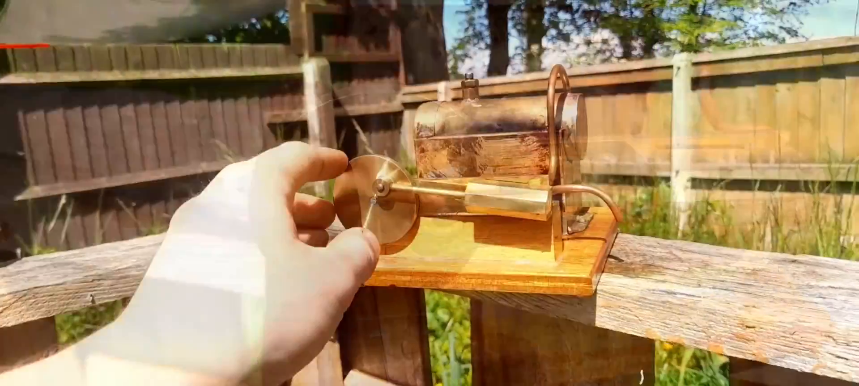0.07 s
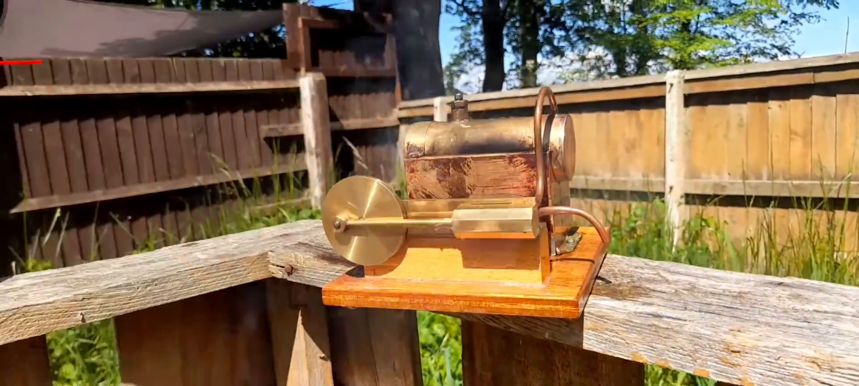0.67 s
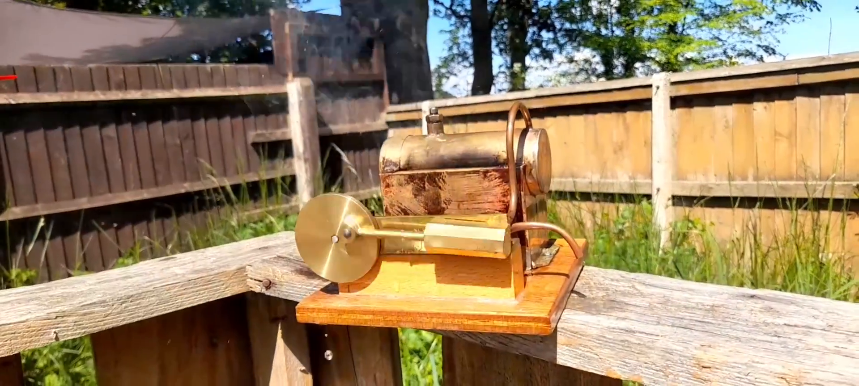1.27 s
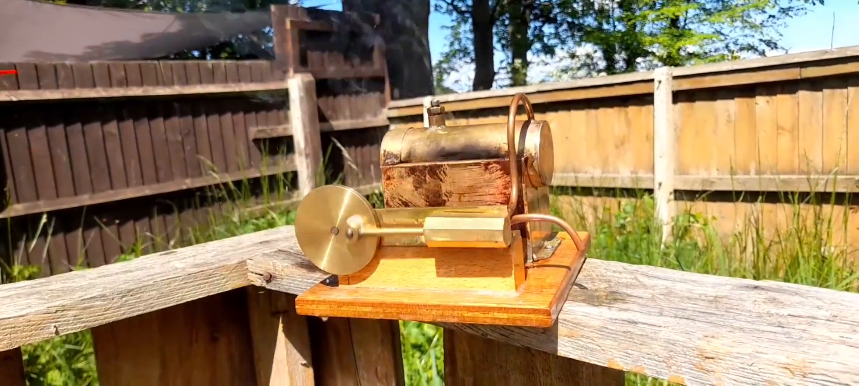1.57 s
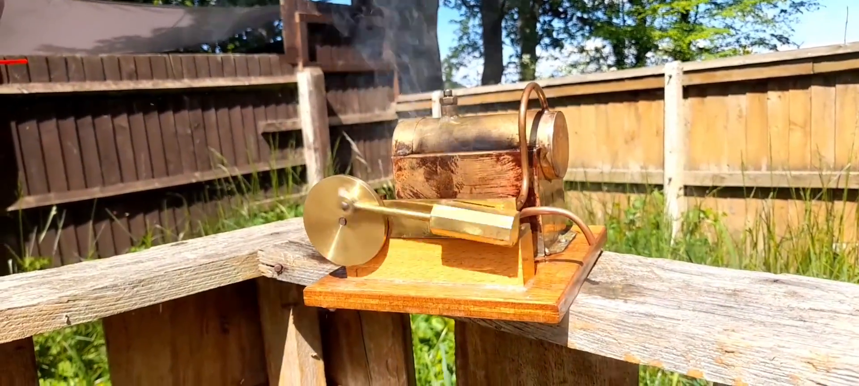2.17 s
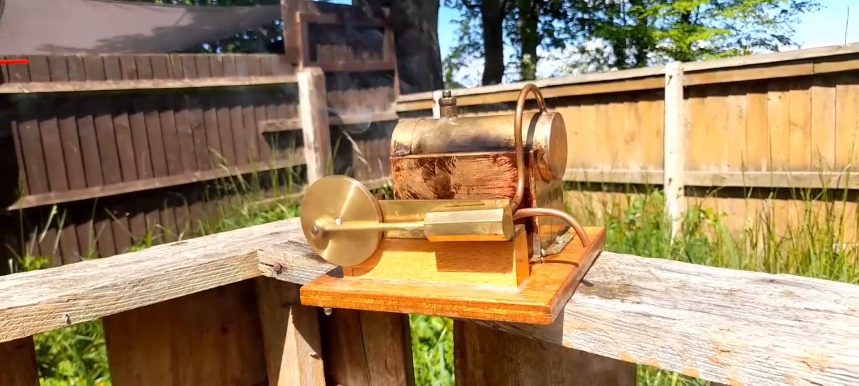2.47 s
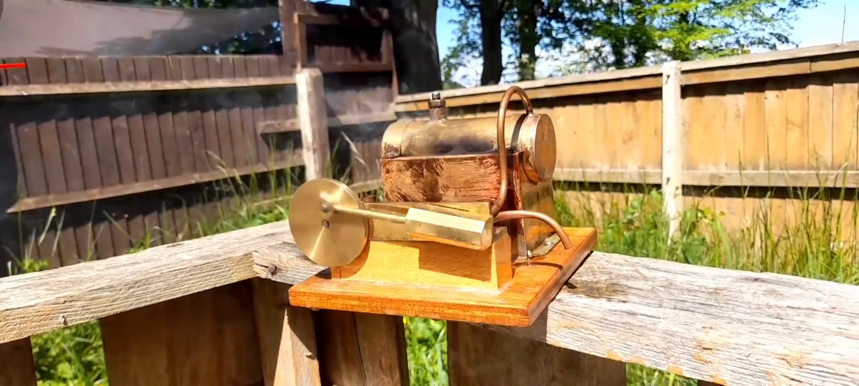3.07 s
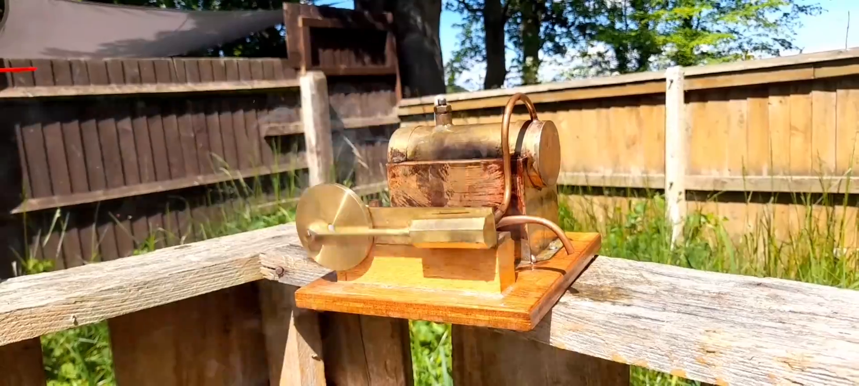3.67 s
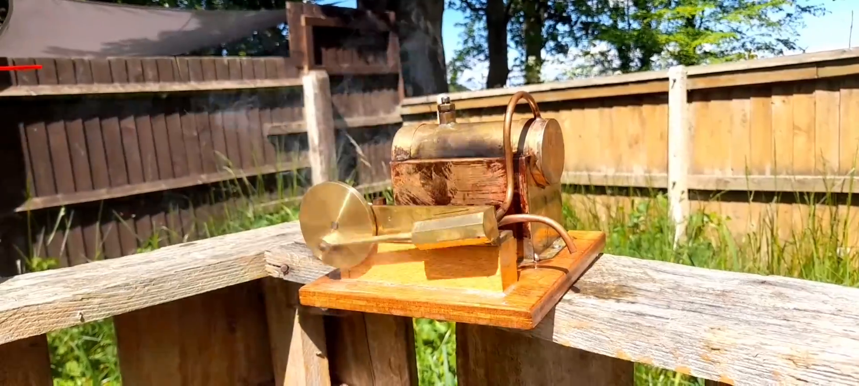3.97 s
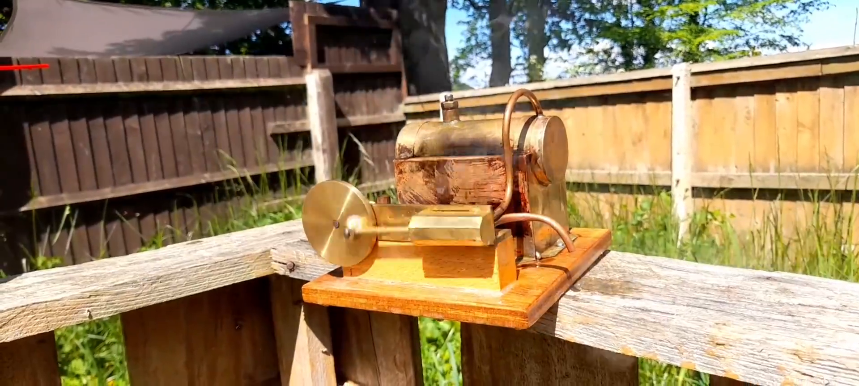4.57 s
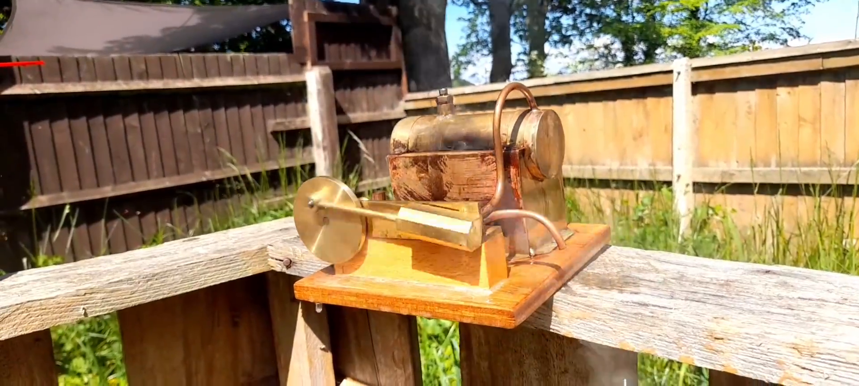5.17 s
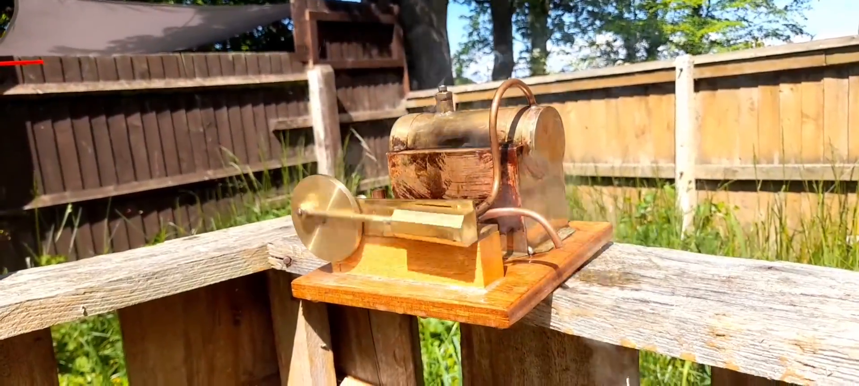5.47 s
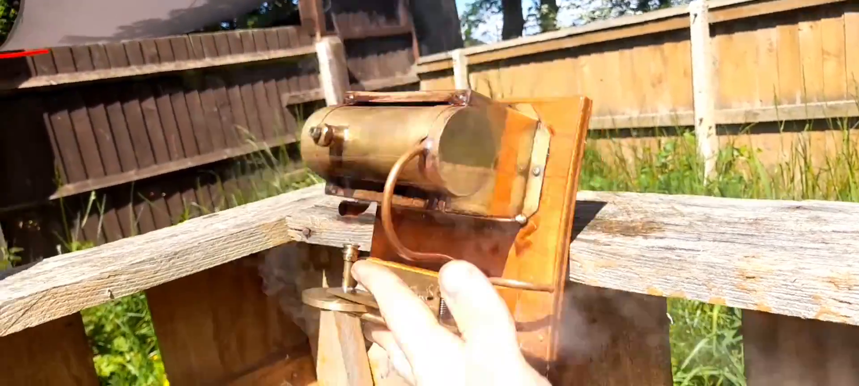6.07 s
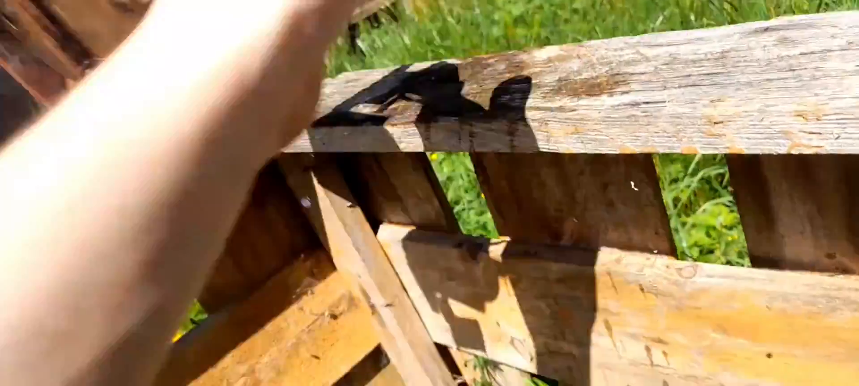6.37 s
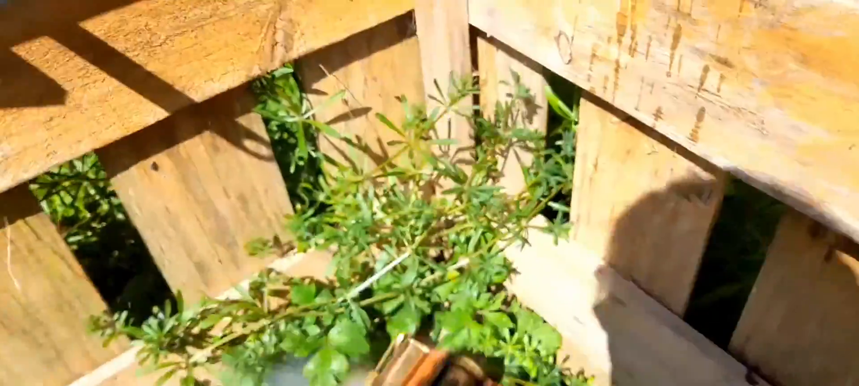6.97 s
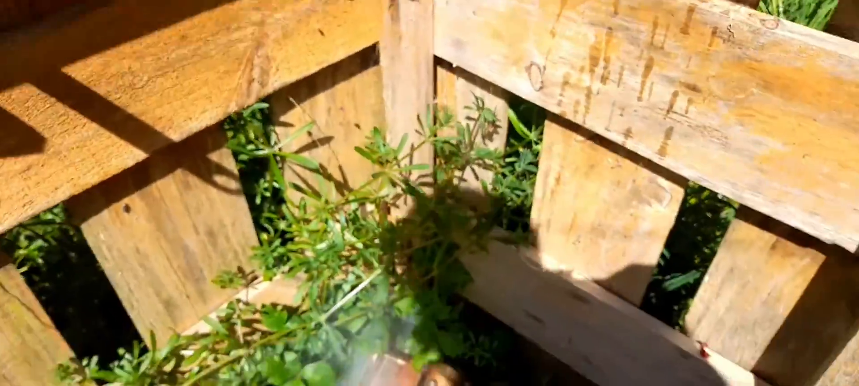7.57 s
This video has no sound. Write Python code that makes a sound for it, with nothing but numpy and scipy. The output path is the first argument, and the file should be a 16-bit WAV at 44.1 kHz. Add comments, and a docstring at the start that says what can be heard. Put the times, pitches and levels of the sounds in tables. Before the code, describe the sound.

A small steam engine is heard close up in a garden, over a soft hiss of leaking steam. At about 0.4 seconds its pivot gives a faint squeak and it starts turning, speeding up over two seconds to a fast, even rhythm of roughly sixteen beats a second. Each beat combines a spit of steam with a light metallic knock. Stray water ticks come through, and low wind gusts buffet the microphone near 0.8 seconds and from 3.8 to 4.6. At 6 seconds the beat stops as the engine scrapes and knocks off a wooden rail, sputtering steam. Loud, dull handling thumps hit the microphone around 6.6 seconds. At 6.8 the engine lands with a loud clatter of wood and ringing brass, bouncing until about 7.1. From the landing, a steady, bright hiss of escaping steam continues to the end, near 8 seconds.

```python
"""A small oscillating steam engine on a garden fence rail is flicked into motion and settles near sixteen
turns a second. Each turn gives a port hiss, a bearing knock, an exhaust spit and a softer return knock,
all noise bursts shaped by its resonances, while joints leak and gusts buffet the microphone.
At six seconds it tips off the rail, the microphone is jostled, and the engine clatters to the ground,
frame and brass ringing, and lies there blowing off steam."""
import sys
import numpy as np
from scipy import signal
from scipy.fft import rfft, irfft
from scipy.io import wavfile
from scipy.ndimage import uniform_filter1d

SR = 44100
rng = np.random.default_rng(int(sys.argv[2]) if len(sys.argv) > 2 else 0)


def bounce(signal):
    """Save signal as a 16-bit WAV file at the path given by the first command-line argument."""
    frames = np.transpose(np.atleast_2d(signal))
    limited = np.clip(frames, -1, 1)
    pcm = np.round(limited * 32767).astype(np.int16)
    wavfile.write(sys.argv[1], SR, pcm)


N = 343980
TIME = np.arange(N) / SR
FLICK_S, FIRST_TURN_S, TIP_S, LANDING_S = .29, .433, 6.05, 6.8


def from_db(db):
    """Decibels to gain."""
    return 10 ** (np.asarray(db) / 20)


def rms_one(x):
    """Scale to unit rms."""
    return x / np.sqrt(np.mean(x ** 2) + 1e-20)


def in_time(rows):
    """A curve's columns, interpolated to every sample."""
    times, *columns = np.transpose(rows)
    return [np.interp(TIME, times, column) for column in columns]


def at_hz(points, hz):
    """Read a curve on a log-frequency axis."""
    freqs, values = np.transpose(points)
    return np.interp(np.log(hz + 1), np.log(freqs), values)


def add(out, start_s, sound):
    """Mix a stereo sound in at start_s."""
    i = max(int(start_s * SR), 0)
    out[:, i:i + sound.shape[-1]] += sound[:, :max(N - i, 0)]


def drift(rate_hz):
    """Random wander of unit rms that changes about rate_hz times a second."""
    knots = rng.standard_normal(N)
    return rms_one(np.interp(TIME * rate_hz, np.arange(N), knots))


def envelope(start_s, length_s, attack_s, release_s):
    """Rise, hold until length_s has passed, then die away."""
    age = TIME - start_s
    return np.clip(age / attack_s, 0, 1) * np.exp(-np.maximum(age - length_s, 0) / release_s)


def panned(db):
    """Equal-power gains with the left side db above the right."""
    gains = from_db(np.array([[.5], [-.5]]) * db)
    return gains / np.sqrt(np.mean(gains ** 2, axis=0))


def butter(x, hz, kind, order=2):
    """Butterworth filter."""
    sos = signal.butter(order, np.minimum(hz, .45 * SR), kind, fs=SR, output="sos")
    return signal.sosfilt(sos, x)


def resonance(x, hz, width_hz):
    """Ring one hollow note."""
    return butter(x, [hz - width_hz / 2, hz + width_hz / 2], "band", order=1)


def colour(x, eq, size=4096):
    """Minimum-phase EQ through (freq_hz, gain_db) points."""
    gains = from_db(at_hz(eq, np.arange(size // 2 + 1) * SR / size))
    cepstrum = irfft(np.log(gains))
    cepstrum[1:size // 2] *= 2
    cepstrum[size // 2 + 1:] = 0
    impulse = irfft(np.exp(rfft(cepstrum)))
    return signal.fftconvolve(x, impulse[None], axes=-1)[:, :x.shape[-1]]


def struck(modes, t, spread_db):
    """Decaying modes, each with its own strength and phase on either side."""
    hz, db, t60 = np.transpose(modes)[:, :, None, None]
    shape = (len(modes), 2, 1)
    gain = from_db(db + spread_db * rng.standard_normal(shape) - 60 * t / t60)
    return np.sum(gain * np.sin(2 * np.pi * (hz * t + rng.random(shape))), axis=0)


# how the ports colour each side, at full lean: freq_hz, pan_db
AIR_PAN = [(100, -4.5), (400, -3), (900, 1), (1400, -3.5), (2200, -2), (3400, -3.5), (5300, -14),
           (7000, -8), (8500, 1.5), (15000, 0)]
# how alike the two sides are: freq_hz, correlation
AIR_CORRELATION = [(60, 0.47), (250, 0.88), (700, 0.59), (1400, 0.54), (3000, 0.12), (7000, 0.016),
                   (15000, 0.13)]
def air_noise(lean=0.79):
    """White stereo noise, narrow in the lows, wide on top; lean pulls the presence range right."""
    hz = np.arange(N // 2 + 1) * SR / N
    mid, side = rfft(rng.standard_normal((2, N)))
    alike = np.clip(at_hz(AIR_CORRELATION, hz), -.95, .95)
    pair = np.sqrt(1 + alike) * mid + np.sqrt(1 - alike) * side * [[1], [-1]]
    return rms_one(irfft(pair * panned(lean * at_hz(AIR_PAN, hz)), N))


# flywheel run-up, shared with the engine's strokes: time_s, turns_per_s
FLYWHEEL_SPEED = [(0.527, 7.184), (1.2335, 12.645), (1.657, 14.38), (2.231, 15.3), (3.594, 16.174)]
# steam pressure, riding leaks, exhaust and port hiss alike: time_s, gain_db
STEAM_PRESSURE = [(2.2, 1), (3.3, -0.5), (4.3, 1.5), (5.3, -1), (6.0, -.5)]
# tone of the burner and leaks: freq_hz, gain_db
LEAK_EQ = [(88, -39), (150, 1.5), (182, -11.5), (275, 1.5), (854, -8), (1020, -12.5), (1360, -5),
           (1530, -11.5), (3420, -10), (4080, -8.5), (5360, -5.5), (6770, -7), (8230, -23.5), (12700, -14),
           (16000, -22.5)]
def leaks(rest_db=-59, full_speed_db=-51, tipped_db=-47.5, fade_s=0.056):
    """Burner and leaking joints make a soft, uneven bed that rises at the flick and again at the tip."""
    speed, = in_time(FLYWHEEL_SPEED)
    pressure_db, = in_time(STEAM_PRESSURE)
    started, tipped = (np.clip((TIME - s) / fade_s, 0, 1) for s in (FLICK_S, TIP_S))
    running_db = full_speed_db + pressure_db - 0.53 * (speed.max() - speed)
    level_db = (1 - started) * rest_db + (started - tipped) * running_db + tipped * tipped_db
    return from_db(level_db + 2.25 * drift(120)) * rms_one(colour(air_noise(lean=0.92), LEAK_EQ))


# tone of the buffeting: freq_hz, gain_db
WIND_EQ = [(20, -39), (40, -1.5), (70, 4.5), (110, 4.5), (180, -11.5), (300, -24.5), (600, -44.5),
           (2000, -61)]
# gusts on the microphone: peak_s, half_length_s, gain_db, pan_db
WIND_GUSTS = [(0.39, 0.043, -42, 32), (0.593, 0.058, -51, 28), (0.779, 0.023, -26, 36),
              (0.865, 0.034, -30, 24), (0.976, 0.016, -34.5, 23), (1.174, 0.019, -42.5, -29),
              (1.385, 0.019, -37.5, -29), (1.5, 0.02, -36.5, -30), (1.833, 0.042, -41.5, 6),
              (2.073, 0.054, -52, 5), (2.25, .03, -46, 13), (2.585, 0.021, -47, 13), (3.8, 0.052, -26, -40),
              (3.92, 0.033, -43, -8), (4.057, .04, -44, -5), (4.243, .035, -45, -20),
              (4.403, 0.054, -31.5, -22), (4.565, 0.053, -35.5, -6.5), (4.74, 0.062, -47.5, -15)]
# jolts that shake the microphone: start_s, level_db, pan_db
MIC_JOLTS = [(6.545, -18, -7), (6.63, -21.5, -7), (6.823, -24, -2), (7.297, -48, 0)]
def wind_and_jolts(breeze_db=-57.5):
    """Low buffeting: a light breeze, gusts that swell and fade on one side, and the rumble of jolts."""
    buffet = colour(air_noise(lean=0), WIND_EQ)
    buffet /= np.sqrt(uniform_filter1d(buffet ** 2, size=3000, axis=-1))  # even out the noise's level
    power = from_db(breeze_db + 3 * drift(6.6)) ** 2
    for peak_s, half_length_s, db, pan_db in WIND_GUSTS:
        swell = 1 / np.cosh(np.minimum(1.33 * np.abs(TIME - peak_s) / half_length_s, 20))
        power = power + (from_db(db + 2.5) * panned(pan_db) * swell) ** 2
    for start_s, db, pan_db in MIC_JOLTS:
        shake = envelope(start_s, length_s=0.013, attack_s=0.0064, release_s=0.033)
        power = power + (from_db(db) * panned(pan_db) * shake) ** 2
    return np.sqrt(power) * buffet


# pivot chirps: peak_s, pitch_hz, level_db, width_s
PIVOT_SQUEAKS = [(0.371, 4350, -46.5, 0.0063), (.506, 3900, -52.5, .004)]
def pivot_squeaks():
    """The dry pivot gives brief, breathy notes as the flywheel is flicked."""
    noise, out = air_noise(), np.zeros((2, N))
    for peak_s, hz, db, width_s in PIVOT_SQUEAKS:
        swell = np.exp(-((TIME - peak_s) / width_s) ** 2 / 2)
        out += from_db(db) * swell * rms_one(resonance(noise, hz, hz / 15))
    return out


def each_turn(tone, noise, lead_turns, level_db, rise_s, decay_s, spread_db, jitter_s):
    """One noise burst a turn, filtered by tone, lead_turns before the exhaust opens, until the tip."""
    speed, = in_time(FLYWHEEL_SPEED)
    turns = np.cumsum(speed) / SR
    turns -= np.interp(FIRST_TURN_S, TIME, turns)
    count = np.arange(np.interp(TIP_S, TIME, turns))
    leads = np.interp(count, turns, lead_turns + np.zeros(N))
    starts = np.interp(count - leads, turns, TIME)
    out, t = np.zeros((2, N)), np.arange(SR // 25) / SR
    shape = (1 - np.exp(-(t / rise_s) ** 2)) * np.exp(-t / decay_s)
    slices = noise[:, :len(count) * len(t)].reshape(2, len(count), len(t))
    # the same surfaces meet on every turn, so part of each burst repeats
    slices = (slices + from_db(-2.5) * slices[:, :1]).reshape(-1, len(t))
    bursts = tone(slices * shape).reshape(2, len(count), -1)
    for k, (late, strong) in enumerate(rng.standard_normal((len(count), 2))):
        gain = from_db(level_db[int(starts[k] * SR)] + spread_db * strong)
        add(out, starts[k] + jitter_s * late, gain * rms_one(bursts[:, k]))
    return out


# the running engine's resonances: pitch_hz, width_hz, gain_db
BODY_MODES = [(393, 166, -4.5), (856, 54, -0.5), (1163, 94, -7), (1353, 34, 7.5), (1808, 58, -2.5),
              (2720, 380, -7), (3444, 180, 1.0), (4490, 330, 3), (5300, 680, -2), (5900, 380, -2.5),
              (6580, 610, -3.5)]
def engine_body(x):
    """The engine's resonances ring in parallel, in alternating polarity."""
    out = 0
    for k, (hz, width_hz, db) in enumerate(BODY_MODES):
        radius = np.exp(-np.pi * width_hz / SR)
        feedback = [1, -2 * radius * np.cos(2 * np.pi * hz / SR), radius ** 2]
        mode = signal.lfilter([1, 0, -1], feedback, x) * (1 - radius ** 2) / 2
        out = out + (-1) ** k * from_db(db) * mode
    return out


def cylinder(x):
    """The cylinder's hollow note, rung by the piston at either end of its travel."""
    return resonance(x, hz=1365, width_hz=130)


# play in the bearing: time_s, lead_turns, knock_gain_db, hollow_offset_db
BEARING_PLAY = [(0.43, 0.22, -44, -8.5), (1.0, 0.22, -36, -18), (1.4, 0.25, -40.5, -8),
                (1.9, 0.25, -36.5, -1.5), (2.3, 0.3, -36, -4), (3.0, .285, -41, -7.5),
                (4.2, 0.32, -40, -8.5), (6.0, 0.32, -40.5, -7.5)]
# the crank pin's tinkle during the run-up: time_s, level_db
PIN_TINKLE = [(0.4, -66.5), (2.5, -56), (3.1, -71)]
def knocks():
    """Each turn the bearing takes up its slack, the crank pin tinkles and the piston knocks back."""
    speed, = in_time(FLYWHEEL_SPEED)
    lead, knock_db, hollow_db = in_time(BEARING_PLAY)
    tinkle_db, = in_time(PIN_TINKLE)
    shaking = np.exp(-((speed - 10.85) / 1.9) ** 2)  # a shaky range of speeds swells the return knock
    return_db = -61 - 1.3 * (speed.max() - speed) + 18 * shaking
    grit = air_noise() * from_db(4.3 * drift(3000))
    crank_pin = lambda x: resonance(x, hz=12200, width_hz=830)
    knock = each_turn(engine_body, grit, lead + .012, knock_db - 9,
                      rise_s=.0016, decay_s=.0018, spread_db=1.2, jitter_s=.0003)
    hollow = each_turn(cylinder, air_noise(), lead, knock_db + hollow_db - 11.5,
                       rise_s=.00059, decay_s=.0042, spread_db=1.5, jitter_s=.00029)
    tinkle = each_turn(crank_pin, air_noise(), lead + .03, tinkle_db,
                       rise_s=.00079, decay_s=.0022, spread_db=1.5, jitter_s=.0003)
    return_knock = each_turn(cylinder, air_noise(), lead - .55, return_db,
                             rise_s=.0012, decay_s=.0035, spread_db=0.5, jitter_s=.00034)
    return knock + hollow + tinkle + return_knock


# tone of the exhaust pipe: freq_hz, gain_db
EXHAUST_EQ = [(200, -41), (800, 1), (1350, -7), (2000, -1.5), (3500, -0.5), (5200, 3), (6800, -1.5),
              (7900, -14), (10000, -7), (12700, -5.5), (16000, -8.5)]
def exhaust():
    """Wet steam spits out once a turn and trails off, louder with speed and pressure."""
    speed, = in_time(FLYWHEEL_SPEED)
    pressure_db, = in_time(STEAM_PRESSURE)
    spit_db = -50.5 + pressure_db - 2.9 * (speed.max() - speed)
    grit = air_noise() * from_db(3.5 * drift(3000))
    pipe = lambda x: colour(x, EXHAUST_EQ)
    spit = each_turn(pipe, grit, lead_turns=.03, level_db=spit_db,
                     rise_s=.0016, decay_s=.0015, spread_db=1.1, jitter_s=.0004)
    trail = each_turn(pipe, air_noise(), lead_turns=.05, level_db=spit_db - 6.5,
                      rise_s=.002, decay_s=.0062, spread_db=1.5, jitter_s=.00067)
    return spit + trail


# water spits and stray ticks: start_s, dry_peak_db, pitch_hz
WATER_TICKS = [(0.4599, -36, 1160), (0.469, -38, 1200), (1.013, -35, 3000), (1.416, -20.5, 3420),
               (1.415, -26.5, 970), (1.428, -27, 2700), (1.487, -31, 1490), (2.03, -25.5, 1030),
               (3.916, -26, 5970), (4.067, -30.5, 1700), (4.572, -27, 1690), (4.633, -26, 4500),
               (4.701, -30, 13000), (4.896, -28.5, 7000), (4.928, -31, 1440), (5.24, -27, 1560),
               (5.61, -28.5, 6700)]
def ticks(decay_s=0.002, ring_db=3.0):
    """Spitting water and lone sharp ticks, which also ring the engine's body."""
    out, t = np.zeros((2, N)), np.arange(SR // 50) / SR
    for start_s, db, hz in WATER_TICKS:
        burst = rng.standard_normal((2, len(t))) * np.exp(-t / decay_s)
        tick = butter(burst, [hz / 2, hz * 1.28], "band", order=1)
        add(out, start_s, from_db(db) * panned(-3.6) * tick / np.abs(tick).max())
    return out + from_db(ring_db) * engine_body(out + 1e-18)


# tone of the steam port: freq_hz, gain_db
PORT_EQ = [(1000, -15), (3500, 3), (4600, -7), (5500, 3), (6700, -4), (7800, -9.5), (16000, -12)]
def port_whistle(x, from_hz=4400, to_hz=7000, glide_s=.014, whistle_db=6.0):
    """As the port narrows, a breathy whistle climbs through its hiss."""
    hz = np.interp(np.arange(x.shape[-1]) / SR, [0, glide_s], [from_hz, to_hz])
    whistle = butter(x, 520, "low") * np.cos(2 * np.pi * np.cumsum(hz) / SR)
    whistle = (whistle.reshape(2, -1) * panned(-13.0)).reshape(x.shape)
    return rms_one(colour(x, PORT_EQ)) + from_db(whistle_db) * rms_one(whistle)


def port_hiss(full_turns_per_s=13.3):
    """The port hisses just ahead of each knock, fully only once the engine is fast enough."""
    speed, = in_time(FLYWHEEL_SPEED)
    pressure_db, = in_time(STEAM_PRESSURE)
    knock_lead, _, _ = in_time(BEARING_PLAY)
    level_db = -52.5 + pressure_db - 11 * np.maximum(full_turns_per_s - speed, 0)
    return each_turn(port_whistle, air_noise(lean=0.76), knock_lead + .205, level_db,
                     rise_s=.01, decay_s=.0033, spread_db=4.0, jitter_s=.00054)


# short jets of steam: start_s, length_s, level_db
STEAM_SPURTS = [(4.894, 0.026, -46), (6.105, 0.017, -27.5), (6.126, 0.093, -34), (6.228, 0.027, -44),
                (6.385, 0.023, -40.5), (6.4117, 0.0018, -19), (6.419, 0.024, -25), (6.445, 0.0046, -21.5),
                (6.458, 0.058, -41.5)]
# tone of a jet, also used for the brass rasp: freq_hz, gain_db
JET_EQ = [(300, 3), (1200, -6), (2500, -5.5), (4000, 0.5), (6200, 6.5), (8000, -12), (12500, -8),
          (16000, -17)]
def steam_spurts():
    """Jets sputter from the boiler as it tips."""
    jets = sum(from_db(db) * envelope(start_s, length_s, attack_s=.0012, release_s=.0073)
               for start_s, length_s, db in STEAM_SPURTS)
    sputter = from_db(2.7 * drift(500))
    return jets * sputter * rms_one(colour(air_noise(lean=0.64), JET_EQ))


# the base slides along the rail: start_s, length_s, level_db
RAIL_SLIDES = [(6.035, .05, -40), (6.09, 0.03, -30), (6.174, 0.039, -27.5)]
def rail_scrape():
    """Wood slips on wood in small jerks that sound the base's hollow note."""
    sliding = sum(from_db(db) * envelope(start_s, length_s, attack_s=.019, release_s=.012)
                  for start_s, length_s, db in RAIL_SLIDES)
    slips = air_noise(lean=0) * from_db(1.6 * drift(400))
    return sliding * rms_one(resonance(slips, hz=1170, width_hz=220))


# hits on rail and ground: start_s, gain_db, wood_pitch_hz, treble_db, pan_db
FALL_HITS = [(6.04, -29.5, 1370, -33, -7), (6.078, -19, 860, -28, -4), (6.097, -6.5, 1346, -33, 3.5),
             (6.253, -23, 1390, -31, 4), (6.279, -12.5, 1190, -17, -4), (6.3, -11.5, 1220, -26, 2),
             (6.386, -23, 1180, -17, 8), (6.395, -14.5, 1250, -32, 2), (6.412, -12, 1150, -5, 8),
             (6.445, -8.5, 834, -11.5, -2), (6.821, -4, 894, -24, -1.5), (6.828, -4, 1380, -34, 14),
             (6.853, -6, 980, -22, -1.5), (6.992, -6, 1340, -44, 2.5), (7.022, -12, 1190, -18, 3.5),
             (7.109, -22.5, 1170, -7, 4)]
# tone of a hit's crack: freq_hz, gain_db
CRACK_EQ = [(150, -21.5), (600, -9.5), (1200, 4), (2200, 1), (3200, -1), (4500, -0.5), (6500, 3.5),
            (7900, -8.5), (12500, -3), (16000, -18)]
# ring of boiler, firebox and base: pitch_hz, gain_db, t60_s
FRAME_MODES = [(295, -4.5, 0.23), (750, -21, 0.068), (820, 2, 0.075), (910, -2, 0.17), (961, -1, 0.13),
               (1100, -19, .12), (1153, 3, 0.2), (1312, 12, 0.049), (1380, 8, 0.039), (1650, -31, .11),
               (1855, 0, 0.25), (2150, -13, 0.11), (2280, 2, 0.15), (2650, 7, 0.14), (3470, -1, 0.11),
               (4300, 7, 0.14), (5400, -12.5, .1), (6220, -11, 0.12)]
def clatter(wood_db=-3.0, ring_db=-7.5):
    """Each hit of the fall is a rough crack, a woody note set by where it lands, and the ringing frame."""
    out, t = np.zeros((2, N)), np.arange(SR // 4) / SR
    noise = air_noise()
    unit_attack = lambda x: x / np.sqrt(np.mean(x[:, :SR // 100] ** 2))  # unit rms in the first 10 ms
    for k, (start_s, db, wood_hz, treble_db, pan_db) in enumerate(FALL_HITS):
        bass_db, contact_s = (0, .0031) if start_s < LANDING_S else (23, .0076)  # rail, then ground
        shape = np.exp(-t / contact_s) * (1 - np.exp(-t / 0.0014))
        contact = noise[:, k * len(t):(k + 1) * len(t)] * shape
        hit_eq = [(350, bass_db), (900, 0), (6500, 0.014), (9000, treble_db + 16.5)]
        crack = unit_attack(colour(colour(contact, CRACK_EQ), hit_eq))
        wood = unit_attack(resonance(contact, wood_hz, width_hz=110))
        frame = struck(FRAME_MODES, t, spread_db=4.0) * (1 - np.exp(-t / 0.00064))
        ring = unit_attack(butter(frame, 1900, "low", order=1))
        hit = unit_attack(crack + from_db(wood_db) * wood + from_db(ring_db) * ring)
        add(out, start_s + 0.00081, from_db(db - 10) * panned(pan_db) * hit)
    return out


def hand_rub(level_db=-44):
    """A hand shifts its grip beside the microphone: one soft, uneven rub on the housing."""
    rub = rms_one(butter(air_noise(), [170, 400], "band"))
    unevenness = from_db(3.5 * drift(70))
    stroke = envelope(start_s=6.52, length_s=0.58, attack_s=0.092, release_s=.09)
    return from_db(level_db) * stroke * unevenness * rub


# handling thumps: start_s, peak_db, decay_s, cutoff_hz, pan_db
MIC_BUMPS = [(6.5511, -6, 0.011, 1070, -11), (6.557, 0.5, 0.0022, 636, -8), (6.5654, -3, 0.002, 593, -27),
             (6.6096, -14, 0.0067, 1100, 1), (6.617, -8, 0.015, 1010, -0.5), (6.639, -17.5, 0.035, 497, 0),
             (6.6747, -4, 0.00061, 4000, -21), (6.7697, 3.5, 0.00023, 2320, -27),
             (7.304, -30, 0.0026, 610, -4), (7.429, -31.5, 0.0021, 700, -24)]
def mic_bumps():
    """Dull knocks carried straight through the microphone's housing."""
    out, t = np.zeros((2, N)), np.arange(SR // 10) / SR
    for start_s, db, decay_s, hz, pan_db in MIC_BUMPS:
        noise = rng.standard_normal(len(t)) + 1.14 * rng.standard_normal((2, len(t)))
        housing_eq = [(50, -14), (150, 0), (330, 1), (hz, 0), (hz * 1.13, -10), (hz * 5, -19),
                      (22000, -50)]
        bump = colour(noise * np.exp(-t / decay_s), housing_eq)
        add(out, start_s, from_db(db) * panned(pan_db) * bump / np.abs(bump).max())
    return out


# landings of a loose brass part: start_s, gain_db, low_cut_hz
BRASS_HITS = [(6.7062, -19.5, 970), (6.965, -24, 4000)]
# its undamped ring: pitch_hz, gain_db, t60_s
BRASS_MODES = [(1895, 3, 0.063), (3120, -5.5, 0.15), (4550, 6, 0.074), (4850, -9, 0.024), (5770, 9, 0.019),
               (7340, -5, .04), (9744, -26, 0.046), (10800, -10, 0.15), (13400, -14, 0.061)]
def brass_pings(rasp_db=7.5, rasp_s=0.0065, damping_s=0.028):
    """Brass lands with a rasp and rings until the contact damps it; a light touch rings thinner."""
    out, t = np.zeros((2, N)), np.arange(SR // 8) / SR
    for start_s, db, low_cut_hz in BRASS_HITS:
        rasp = colour(rng.standard_normal((2, len(t))) * np.exp(-t / rasp_s), JET_EQ)
        shape = (1 - np.exp(-t / 0.00067)) * np.exp(-t / damping_s)
        ring = struck(BRASS_MODES, t, spread_db=2.5) * shape
        ping = butter(ring + from_db(rasp_db) * rasp, low_cut_hz, "high", order=3)
        add(out, start_s, from_db(db) * panned(-9.0) * ping)
    return out


def ground_bounce(x, delay_s=.0011, echo_db=-12):
    """A faint echo off the ground combs the hiss; the comb barely shifts as the microphone sways."""
    late = TIME - delay_s - .00003 * drift(3)
    return x + from_db(echo_db) * np.array([np.interp(late, TIME, side) for side in x])


# faders for the blow-off's two bands: time_s, low_gain_db, high_gain_db
BLOWOFF_FADERS = [(6.83, -44, -40), (6.964, -39, -40), (7.164, -40, -38), (7.442, -42.5, -39.5),
                  (7.8, -43.5, -39.5)]
# tone of the escaping steam: freq_hz, gain_db
BLOWOFF_EQ = [(150, -21), (450, -30), (650, -6.5), (900, -21), (1500, -5.5), (1850, -11), (2350, -5.5),
              (3100, -8.5), (4400, -2.5), (6100, 4), (7900, -0.5), (10500, 1.5), (13500, 7), (16000, -1.5)]
def blow_off(start_s=6.83):
    """The fallen boiler vents a steady hiss that grows brighter as the steam dries."""
    low_db, high_db = in_time(BLOWOFF_FADERS)
    hiss = ground_bounce(colour(air_noise(), BLOWOFF_EQ))
    low = from_db(low_db + 5.5 + 1.3 * drift(90)) * rms_one(butter(hiss, 6680, "low", order=6))
    high = from_db(high_db + 4.5 + 1.5 * drift(35)) * rms_one(butter(hiss, 8000, "high", order=6))
    opened = np.clip((TIME - start_s) / 0.013, 0, 1)
    flutter = from_db(0.74 * drift(150))
    return opened * (low + high) * flutter


# slaps off the fences: mean_delay_s, level_db
FENCE_ECHOES = [(.0047, -11.5), (0.0147, -23), (.031, -23), (.047, -33)]
def garden(x, tail_db=-21.5, t60_s=0.83):
    """A few fence echoes and a faint, dull scatter from the yard."""
    t = np.arange(SR // 2) / SR
    scatter = butter(rng.standard_normal((2, len(t))), 6500, "low")
    tail = scatter * from_db(-60 * t / t60_s) * (1 - np.exp(-t / 0.0024))
    response = from_db(tail_db) * tail / np.sqrt(np.sum(tail ** 2) / 2)
    for delay_s, db in FENCE_ECHOES:
        taps = (delay_s * SR * rng.uniform(.85, 1.15, 2)).astype(int)  # one for each side
        response[[0, 1], taps] += from_db(db)
    return x + signal.fftconvolve(x, response, axes=-1)[:, :N]


def scene():
    """Engine and fall echo in the garden; brass, steam, handling, wind and squeaks stay dry."""
    engine = knocks() + exhaust() + port_hiss() + ticks()
    echoing = garden(engine + clatter() + rail_scrape())
    brass = brass_pings()
    steam = leaks() + steam_spurts() + blow_off()
    on_microphone = mic_bumps() + hand_rub() + wind_and_jolts()
    return echoing + brass + steam + on_microphone + pivot_squeaks()


def record(dry, low_cut_hz=40, high_cut_hz=15750):
    """Cut the deepest rumble, soft-clip the peaks, then cut the top steeply."""
    clipped = np.tanh(butter(dry, low_cut_hz, "high", order=3))
    return signal.sosfilt(signal.ellip(10, .2, 80, high_cut_hz, fs=SR, output="sos"), clipped)


dry = scene()
out = record(dry)
bounce(out)
```